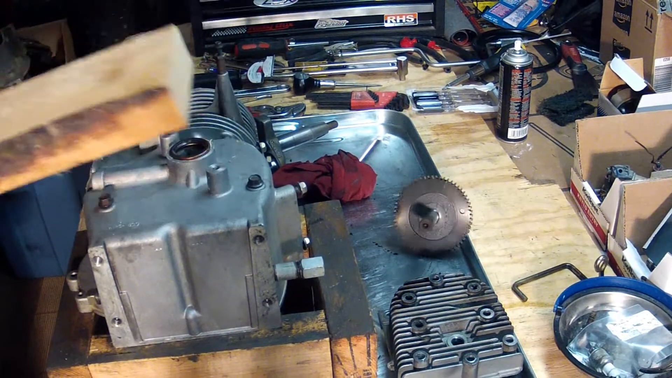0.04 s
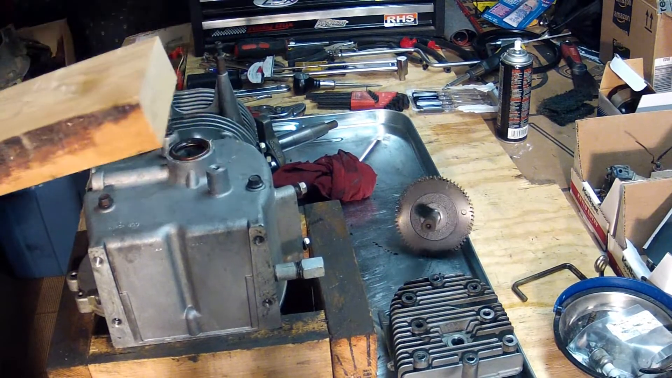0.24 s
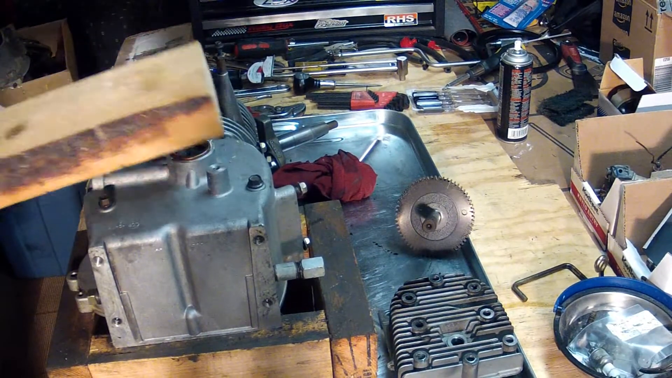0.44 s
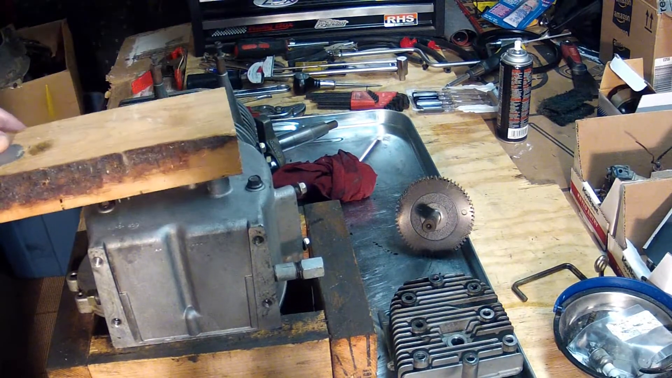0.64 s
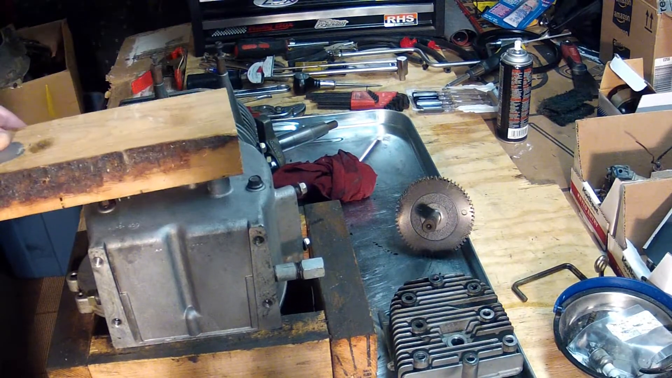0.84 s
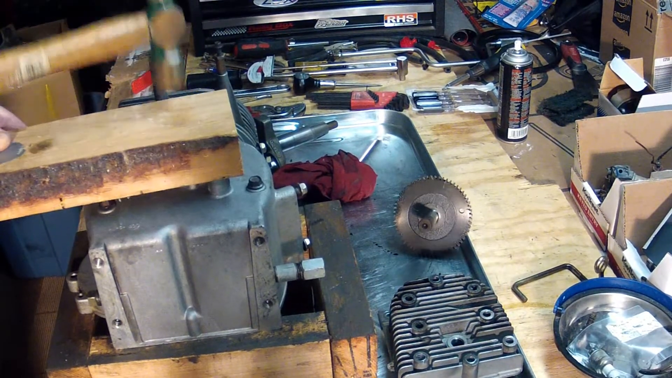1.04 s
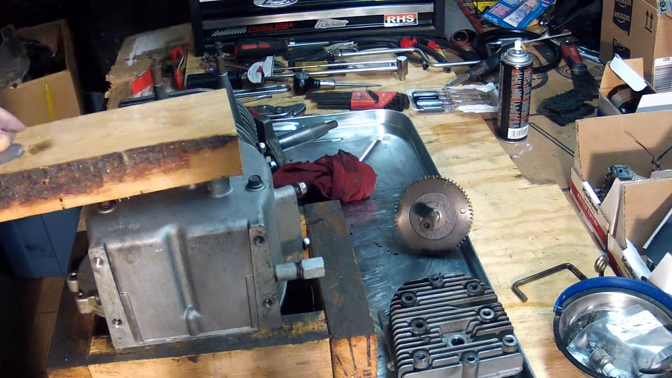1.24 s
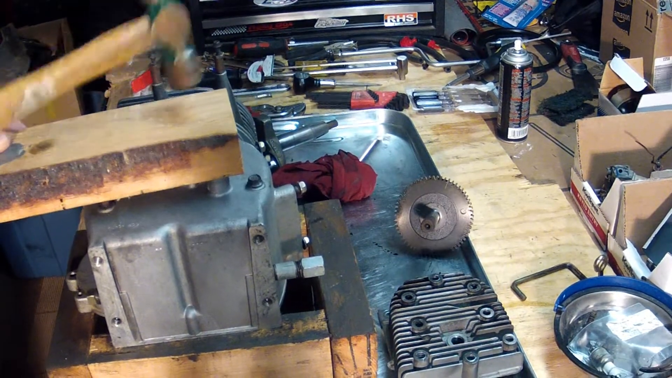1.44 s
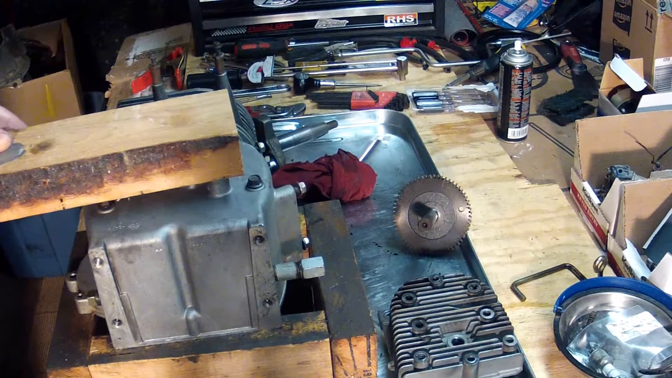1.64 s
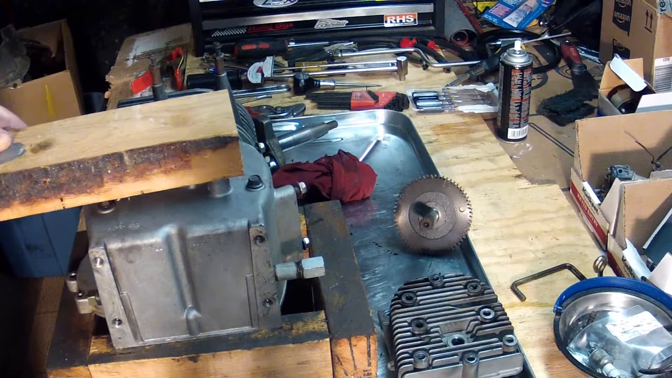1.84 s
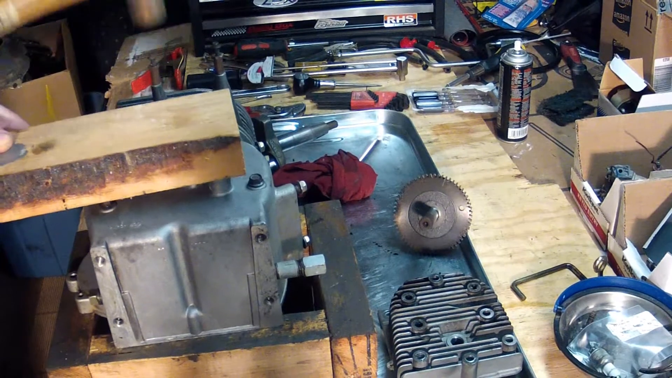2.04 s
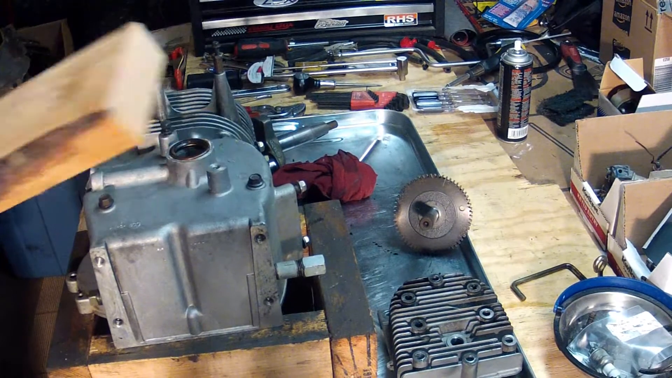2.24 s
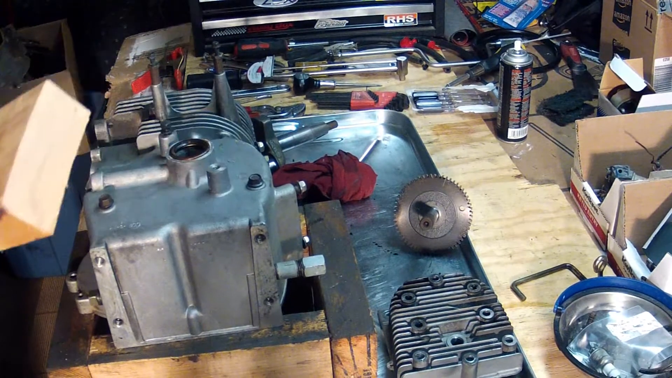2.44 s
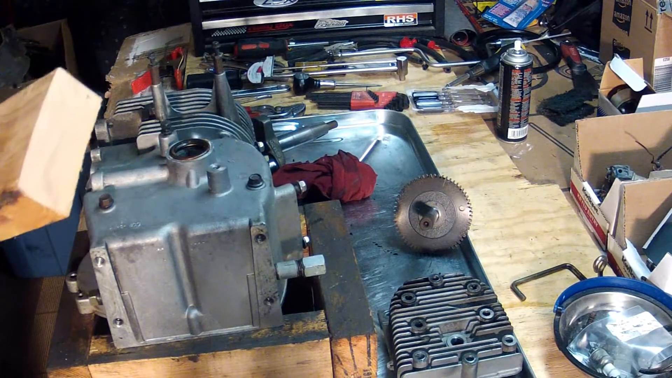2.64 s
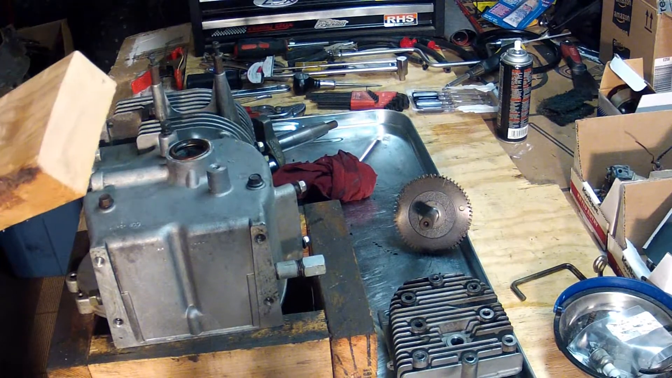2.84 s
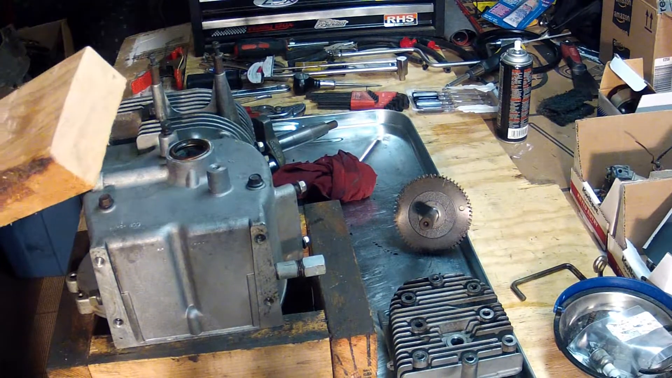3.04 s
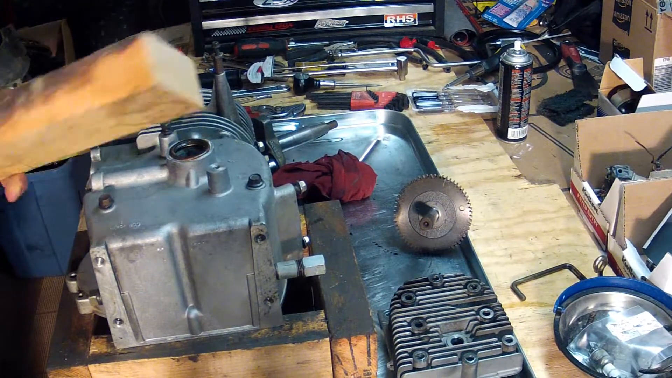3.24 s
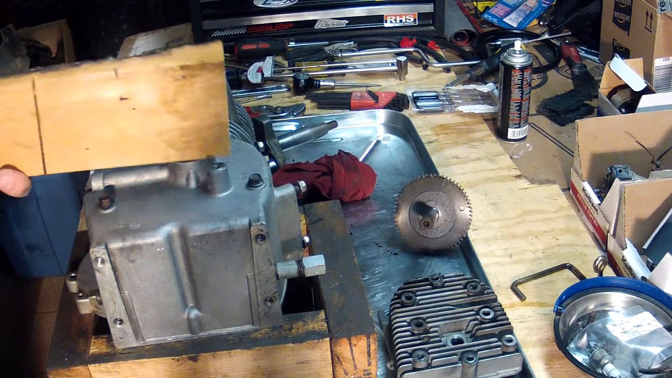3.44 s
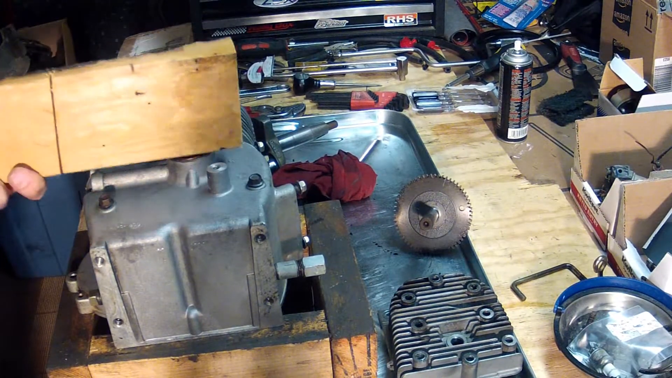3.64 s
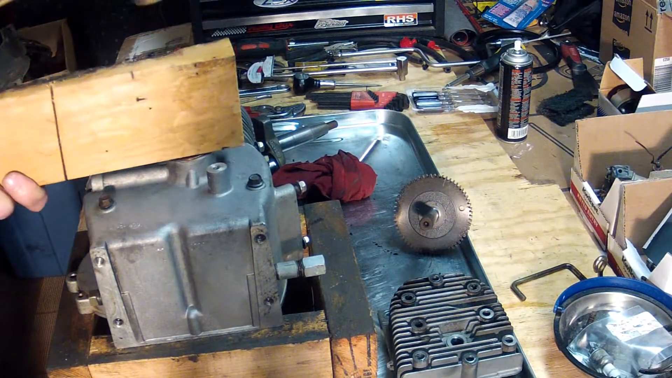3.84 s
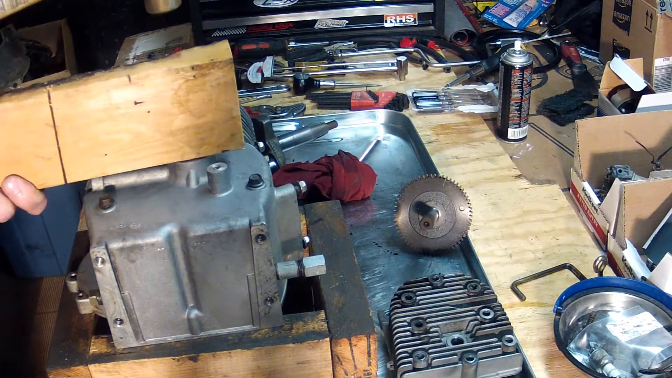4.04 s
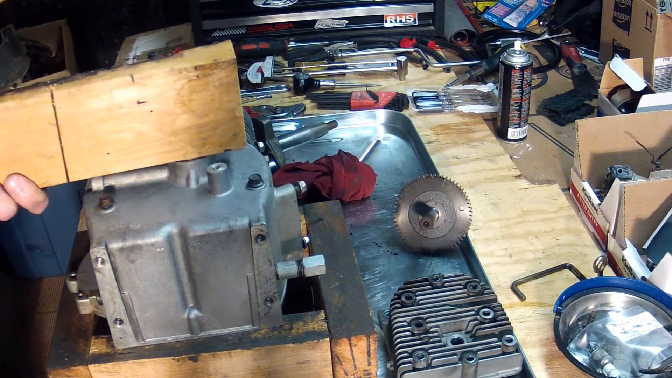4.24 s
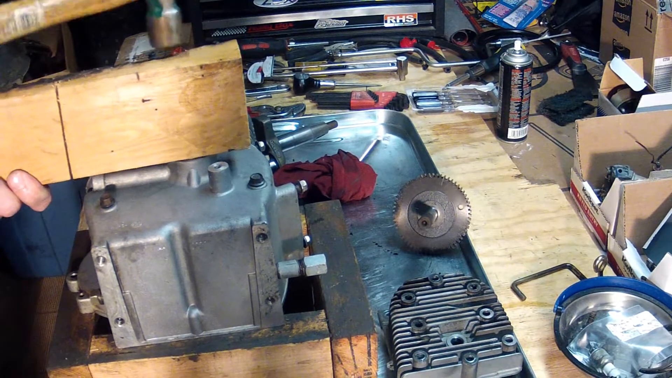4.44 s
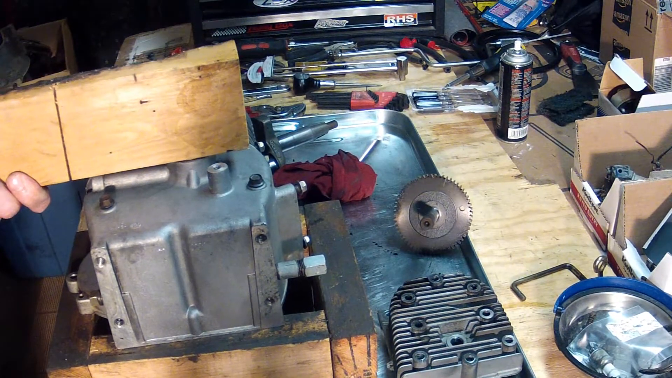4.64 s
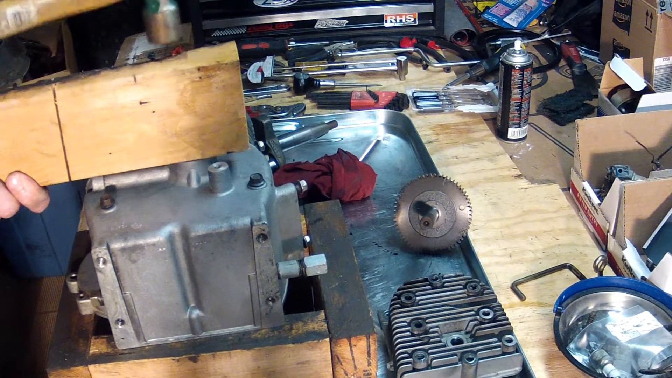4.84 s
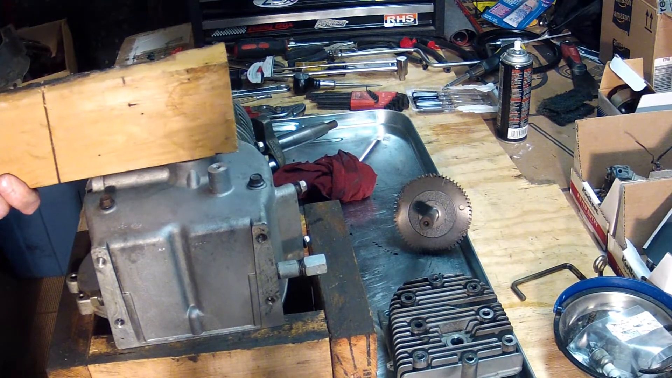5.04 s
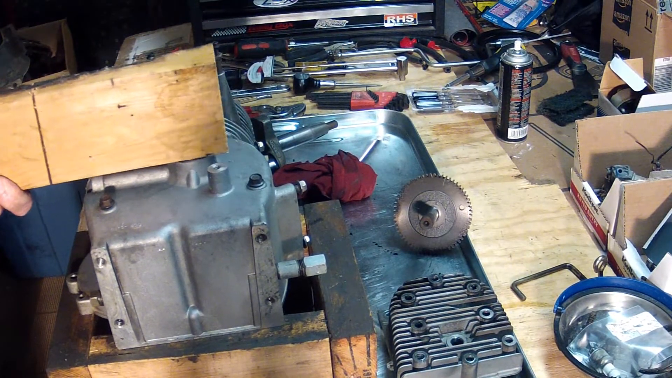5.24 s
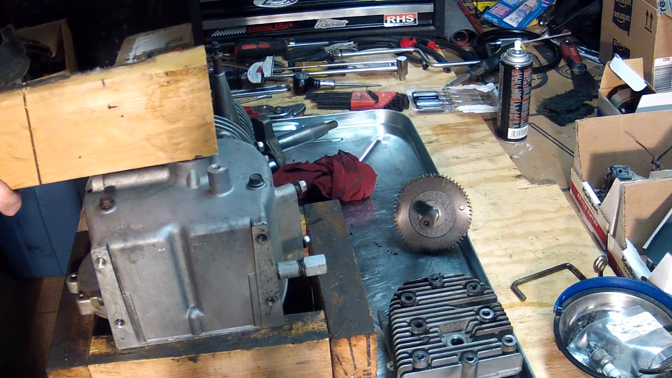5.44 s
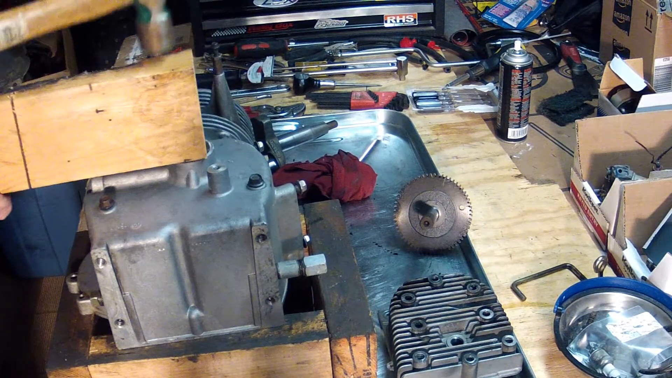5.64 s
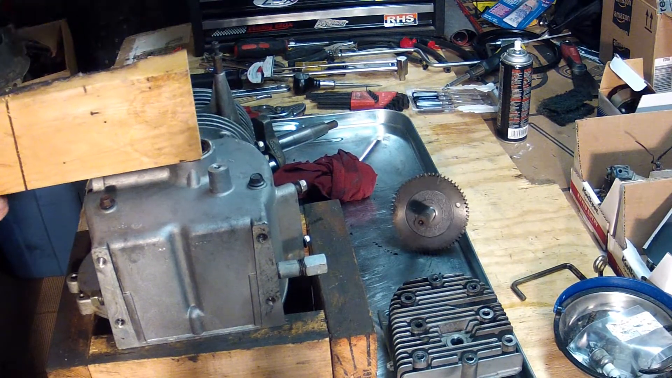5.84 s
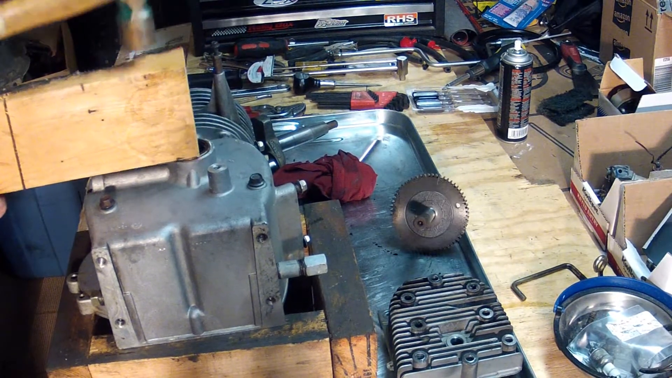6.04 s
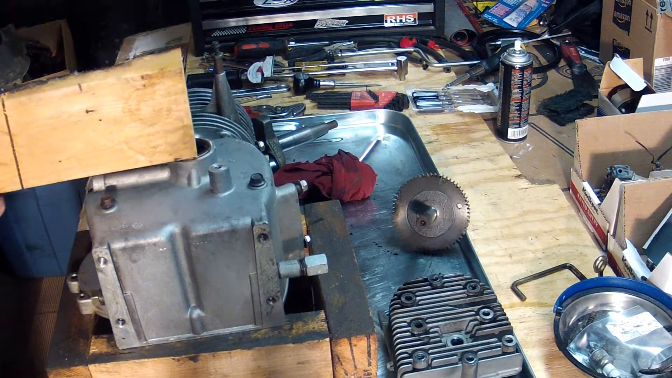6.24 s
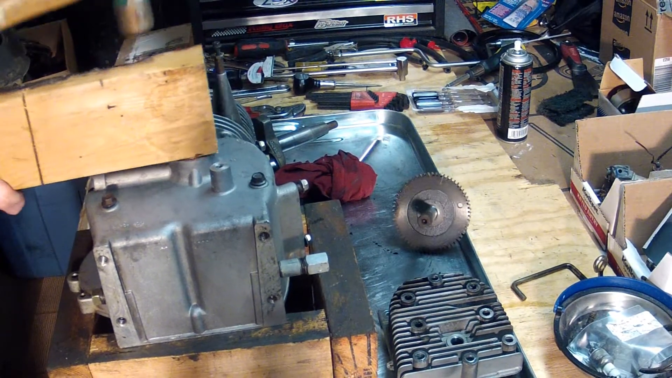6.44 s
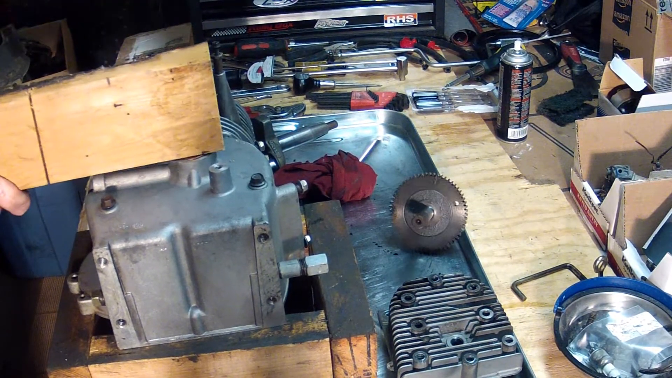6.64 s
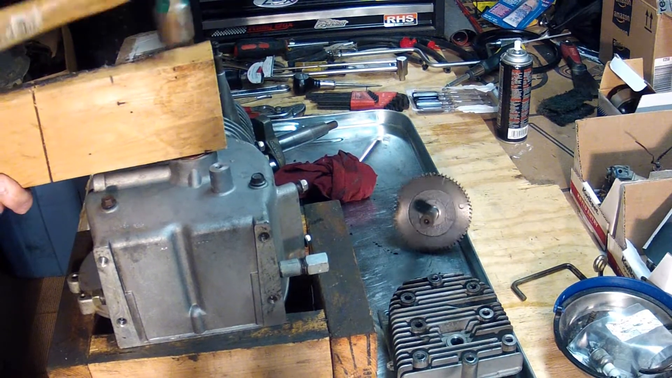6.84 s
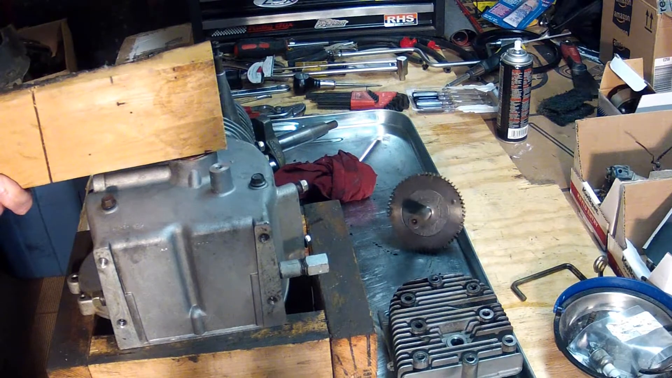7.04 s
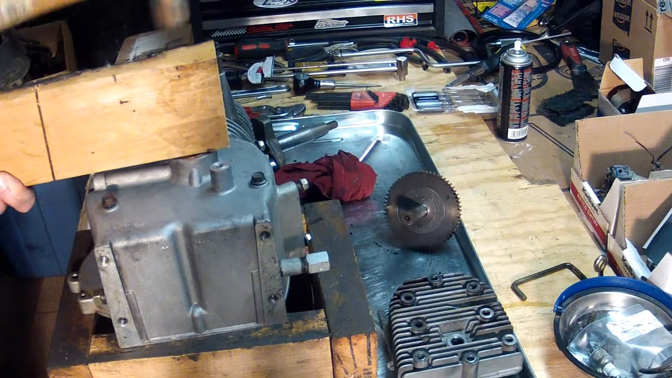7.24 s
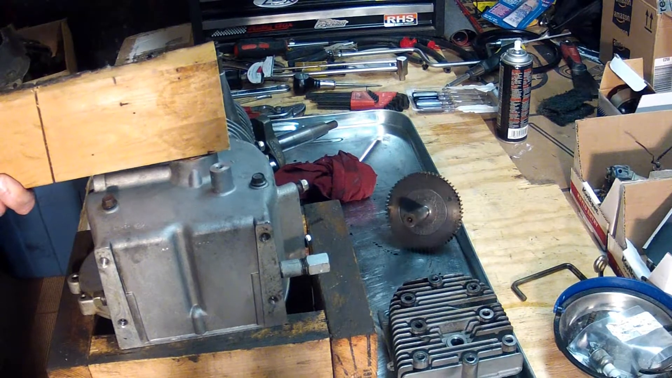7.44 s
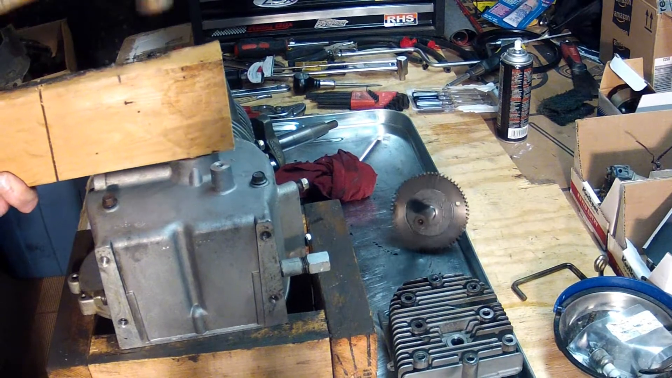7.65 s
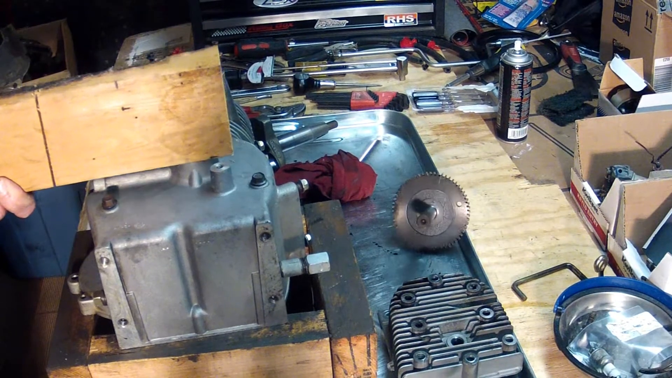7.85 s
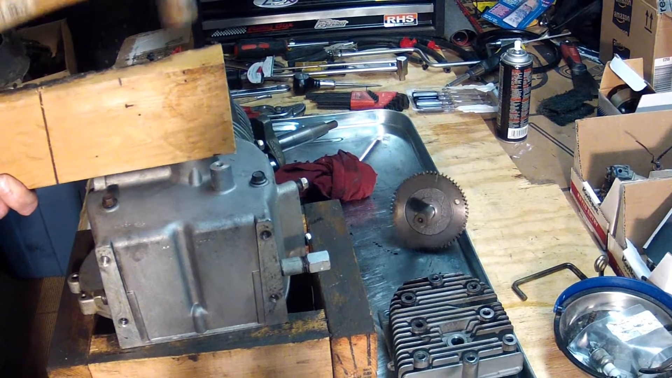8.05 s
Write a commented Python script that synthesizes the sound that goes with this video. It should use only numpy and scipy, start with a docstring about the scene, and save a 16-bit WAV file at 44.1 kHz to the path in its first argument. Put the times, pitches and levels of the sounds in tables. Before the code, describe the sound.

At the start, the ring of a hammer blow dies away in a small workshop. A wooden block scuffs lightly over a metal engine case and settles with a muffled bump at about 0.7 seconds. The hammer strikes the block three times, at about 1, 1.5 and 2 seconds, each harder than the last. Every blow gives a sharp woody crack, a short metallic ring and a thump from the bench. The block shifts faintly, then is set down with a soft thud near 3.8 seconds. Two blows with a slightly different tone land at 4.5 and 4.9 seconds. After a few light scrapes, seven more follow steadily from 5.8 to 8.1 seconds, the last ones growing stronger. The close mono microphone overloads on the knocks, its level dipping and swelling back as the room rings briefly over a faint low rumble.

```python
"""A hammer blow rings away over the low rumble of a small workshop, and a wooden block scuffs on metal.
The hammer is driving a seal into an engine case through the block: three more blows with it lying flat,
then nine, mostly quicker, with it on edge. Each one cracks the wood, rings the case and thumps the bench.
The knocks overload a close mono microphone, whose gain ducks and swells back while the room rings."""
import sys
import numpy as np
from scipy import signal
from scipy.fft import rfft, irfft
from scipy.io import wavfile

SR = 44100
rng = np.random.default_rng(int(sys.argv[2]) if len(sys.argv) > 2 else 0)


def waveform_to_disk(signal):
    """Save audio, clipped to [-1, 1], as 16-bit WAV at the path in sys.argv[1]."""
    frames = np.transpose(np.atleast_2d(signal))
    scaled = np.clip(frames, -1, 1) * 32767
    samples = np.round(scaled).astype(np.int16)
    wavfile.write(sys.argv[1], SR, samples)


N = 357210

# hammer blows, the first just before the scene opens: start_s, strength_db
BLOWS = [(-.115, -8), (1.0532, -4.5), (1.5431, -1), (2.0198, 0.5), (4.4924, -6), (4.878, -2),
         (5.7592, -5.5), (6.1403, -4), (6.508, -6), (6.9198, -3), (7.3102, -1.5), (7.6855, -0.5),
         (8.0987, 1)]
# how the block is held (flat, on edge, drawn back, pushed forward):
# from_s, contact_cutoff_hz, room_db, thump_db, symmetric_mode_bias_db
GRIPS = [(-1, 4400, 4, 3, 1), (4, 2930, 0.27, -0.5, 0.8), (6, 3730, 0, -0.4, 3.5), (7, 3680, 0, 0.55, 0.5)]
# the woody crack of the block, lying flat and standing on edge: pitch_hz, level_db, t60_s
FLAT_BLOCK_MODES = [(465, -4, 0.053), (550, -5.5, 0.06), (650, -3.5, .04), (820, -12.5, .035),
                    (994, -4, 0.039), (1420, -15.5, 0.024), (1693, 1.5, 0.033), (1967, -5, 0.099),
                    (2356, -3, .04), (2428, -7.5, 0.004), (2740, -2.5, 0.034), (2987, -9, .04),
                    (3829, -5.5, .03), (4086, -7.5, 0.064), (4800, -9.5, 0.042)]
EDGE_BLOCK_MODES = [(551.5, -3.5, 0.03), (775, -3, 0.032), (843, -6, 0.041), (1193, -8.5, 0.034),
                    (1438, -10, 0.034), (1679, -25.5, 0.049), (2241, 3, 0.017), (2754, -3, 0.042),
                    (3410, -11, 0.024), (3884, -3.5, 0.025), (4956, 0.5, 0.013)]
# the ring of the case and the metal parts around it: pitch_hz, level_db, t60_s
CASE_MODES = [(236, -22, .45), (261, -19, .5), (279, -7.5, .24), (326, -16, .4), (528, -30, .45),
              (648, -25, .5), (748, -23.5, .55), (1757, -25, .45), (2279, -27, .45), (2690, -20, .35),
              (2778, -23, .42), (3494, -29, .5), (3795, -25, .45), (3955, -28, .45), (4000, -38, .55),
              (4490, -19, .45), (4603, -29, .5), (4700, -29, .5), (4893, -26, .55), (4958, -38, .9),
              (5082, -33, .65), (5515, -33, .6), (5911, -31, .7)]
# case notes that the block stirs most, lying flat and standing on edge: pitch_hz, level_db, t60_s
FLAT_CASE_MODES = [(1050, -20, 0.33), (2245, -15.5, .35), (3940, -21, 0.53), (5360, -33, 0.98)]
EDGE_CASE_MODES = [(2672, -13.5, 0.36), (2655, -18.5, 0.27), (4025, -28, .4)]
# a steel part that sings on between the blows: pitch_hz, level_db, t60_s
STEEL_MODES = [(5270, -43, 2.2)]
# the thump of the engine bouncing on the bench: pitch_hz, level_db, t60_s
BENCH_MODES = [(68.6, -25, .8), (119, -12, 0.044), (288.6, 5, 0.069)]
# tone of the workshop's reverb: frequency_hz, level_db
REVERB_COLOUR = [(35, -19), (68, -5.5), (95, -12.5), (145, -7), (190, -14), (285, 2), (420, -8),
                 (800, -8.5), (1200, -15), (2100, -7), (3050, -6), (3300, -11.5), (5000, -12),
                 (6000, -10.5)]
# length of the reverb tail, band by band: centre_hz, t60_s
REVERB_DECAY = [(70, 0.73), (280, 0.61), (700, 0.5), (2000, 0.46), (5500, 0.43)]
# tone of the background rumble: frequency_hz, level_db
RUMBLE_COLOUR = [(12, -46), (20, -10), (128, -1), (352, -7.5), (435, -10), (663, -16.5), (1090, -22),
                 (1250, -21.5), (2250, -24.5), (2590, -25.5), (3960, -26.5), (5500, -26), (7150, -55),
                 (12100, -120)]
# light scuffs of the block over the metal: start_s, strength_db, length_s
SCUFFS = [(0.229, -39, .012), (0.294, -47, .02), (.366, -58, .01), (.416, -50.5, .04), (.669, -44.5, .006),
          (2.383, -49, .03), (4.781, -44.5, .003), (5.188, -42, .005), (5.332, -47, .003),
          (5.677, -58.5, .02)]
# the block set down on the case: start_s, strength_db
LANDINGS = [(.653, -38), (3.794, -26)]
# the block rocking into its seat: start_s, strength_db, length_s
ROCKINGS = [(.665, -26, .02), (0.751, -34.5, .01), (2.262, -31, .04), (4.002, -45, .002)]

LEAD, RING = SR // 2, 3 * SR // 2  # samples of pre-roll, and of tail after a knock
ON_EDGE_FROM_S = 3


def from_db(db):
    return 10 ** (np.asarray(db) / 20)


def at_hz(points, hz):
    known_hz, values = np.transpose(points)
    return np.interp(np.log(np.maximum(hz, 1)), np.log(known_hz), values)


def low_pass(x, cut_hz, order=2):
    return signal.sosfilt(signal.butter(order, cut_hz, fs=SR, output="sos"), x)


def add(track, start_s, sound):
    """Lay a sound into a track that starts LEAD samples early."""
    i = LEAD + round(start_s * SR)
    track[i:i + len(sound)] += sound[:max(len(track) - i, 0)]


def noise(colour, size):
    """Noise of a given colour, rms 1."""
    gain = from_db(at_hz(colour, np.fft.rfftfreq(size, 1 / SR)))
    x = irfft(rfft(rng.standard_normal(size)) * gain, size)
    return x / x.std()


def ring(modes, rise_s, scatter_db=1.2, symmetric_db=0):
    """Struck modes, alternately symmetric and antisymmetric; each hit shares its force out differently."""
    t, tones = np.arange(RING) / SR, 0
    for k, (hz, db, t60) in enumerate(modes):
        sign = (-1) ** k
        height = from_db(db + sign * symmetric_db + scatter_db * rng.standard_normal())
        decay = np.exp(-np.log(1000) * t / t60)
        tones = tones + sign * height * decay * np.cos(2 * np.pi * hz * t)
    return tones * (1 - np.exp(-t / rise_s))


def knock(start_s, contact_hz, walls, thump_db, metal_db, wood_db=5, symmetric_db=0, linger_db=-16.5):
    """Block, case, bench and room answer one contact; a softer contact leaves out the treble."""
    flat = start_s < ON_EDGE_FROM_S
    block_modes = FLAT_BLOCK_MODES if flat else EDGE_BLOCK_MODES
    case_modes = CASE_MODES + (FLAT_CASE_MODES if flat else EDGE_CASE_MODES)
    steel_db = -14 if flat else 0  # the flat block hardly stirs the steel part
    wood = from_db(wood_db) * ring(block_modes, rise_s=.0014, symmetric_db=symmetric_db)
    case = from_db(metal_db) * ring(case_modes, rise_s=.0096)
    steel = from_db(steel_db) * ring(STEEL_MODES, rise_s=.004)
    bench = from_db(thump_db) * ring(BENCH_MODES, rise_s=.0013, scatter_db=.6)
    # the block's own notes linger in the room
    lingering = from_db(linger_db) * signal.fftconvolve(walls, wood / np.linalg.norm(wood))[:RING]
    echo = wall_echo(from_db(-6.5) * (wood + bench), cut_hz=380) + wall_echo(lingering, cut_hz=980)
    return low_pass(wood + case + steel + bench + echo + walls, contact_hz)


def reverb(build_s=.0045):
    """Dense workshop reflections that bloom quickly and die sooner in the treble."""
    t, hz = np.arange(RING) / SR, np.fft.rfftfreq(RING, 1 / SR)
    spectrum, tail = rfft(noise(REVERB_COLOUR, RING)), 0
    for k, (_, t60) in enumerate(REVERB_DECAY):
        # each band crossfades into its neighbours
        band = at_hz([(centre, j == k) for j, (centre, _) in enumerate(REVERB_DECAY)], hz)
        tail = tail + irfft(spectrum * band, RING) * np.exp(-np.log(1000) * t / t60)
    return tail * (1 - np.exp(-t / build_s))


def wall_echo(x, cut_hz, delay_s=.0205):
    """The nearest wall sends the knock back as a dull slap."""
    delayed = np.pad(x, (round(delay_s * SR), 0))[:len(x)]
    return low_pass(delayed, cut_hz)


def scrape(touch, length_s, slips_per_s=900):
    """Wood slipping on metal smears a touch into a first tap and a spray of random grains."""
    size = round(length_s * SR)
    slips = rng.standard_normal(size) * (rng.random(size) < slips_per_s / SR)
    slips[0] = 2
    return signal.fftconvolve(touch, slips / np.linalg.norm(slips))


def hammering(rebound_s=.027, rebound_db=-13, chatter_above_hz=2500):
    """The hammer lands on the block, which then hops and chatters brightly on the seal."""
    track, shared_reverb = np.zeros(LEAD + N), reverb()
    bright = signal.butter(3, chatter_above_hz, "high", fs=SR, output="sos")
    for start_s, db in BLOWS:
        grip = [row for row in GRIPS if row[0] <= start_s][-1]
        _, contact_hz, room_db, thump_db, symmetric_db = grip
        # the block shifts, so the reflections are only partly alike from blow to blow
        walls = from_db(room_db - 4.5) * (.8 * shared_reverb + .6 * reverb())
        hit = knock(start_s, contact_hz, walls, thump_db, metal_db=1.14, symmetric_db=symmetric_db)
        add(track, start_s, from_db(db) * hit)
        hop = knock(start_s, contact_hz, from_db(-10) * walls, thump_db, metal_db=-9)
        chatter = scrape(signal.sosfilt(bright, hop), length_s=.015, slips_per_s=1500)
        add(track, start_s + rebound_s, from_db(db + rebound_db) * chatter)
    return track


def room_tone(rumble_db=-60.5, hum_hz=112, hum_db=-78):
    """A bed of low rumble and faint mains hum."""
    hum = np.sqrt(2) * np.sin(2 * np.pi * hum_hz * np.arange(LEAD + N) / SR)
    return from_db(rumble_db) * noise(RUMBLE_COLOUR, LEAD + N) + from_db(hum_db) * hum


def scuffing(contact_hz=4300):
    """The block slides over the case in short, light, bright scratches."""
    track = np.zeros(LEAD + N)
    for start_s, db, length_s in SCUFFS:
        touch = knock(start_s, contact_hz, reverb(), thump_db=.5, metal_db=-6.5, wood_db=3.5,
                      linger_db=-28)
        add(track, start_s, from_db(db) * scrape(touch, length_s))
    return track


def setting_down(thud_cut_hz=807, tick_cut_hz=4942, tick_db=-51.5):
    """The block lands on the case with a soft thud and a tick of its edge."""
    track = np.zeros(LEAD + N)
    for start_s, db in LANDINGS:
        walls = reverb()
        thud = knock(start_s, thud_cut_hz, walls, thump_db=3.5, metal_db=8, wood_db=6)
        tick = knock(start_s, tick_cut_hz, walls, thump_db=1, metal_db=3, wood_db=11.5)
        add(track, start_s, from_db(db) * thud + from_db(tick_db) * tick)
    return track


def rocking(contact_hz=432):
    """The block rocks into its seat with muffled, bass-heavy bumps."""
    track = np.zeros(LEAD + N)
    for start_s, db, length_s in ROCKINGS:
        touch = knock(start_s, contact_hz, reverb(), thump_db=6.5, metal_db=-2.5)
        add(track, start_s, from_db(db) * scrape(touch, length_s))
    return track


def automatic_gain(x, threshold_db=-10, late_s=.003, attack_s=.0024, release_db_per_s=70):
    """The gain ducks a few milliseconds too late for the knock, then climbs back steadily."""
    t, window = np.arange(len(x)) / SR, SR // 500
    power = signal.lfilter(np.ones(window) / window, [1], x * x)
    over_db = np.maximum(10 * np.log10(np.maximum(power, 1e-12)) - threshold_db, 0)
    duck_db = np.maximum.accumulate(over_db + release_db_per_s * t) - release_db_per_s * t
    late_duck_db = np.interp(t - late_s, t, duck_db)
    pole = np.exp(-1 / (attack_s * SR))
    return from_db(-signal.lfilter([1 - pole], [1, -pole], late_duck_db))


def scene(leak_s=.0007):
    """One microphone with a pumping gain feeds two almost identical channels."""
    sound = hammering() + setting_down() + rocking() + scuffing() + room_tone()
    gain = automatic_gain(sound)
    mono = (gain * sound)[LEAD:]
    # each change of gain leaks out as a low bump, opposite in the two channels
    bump = -leak_s * SR * low_pass(np.gradient(gain), cut_hz=150, order=1)[LEAD:]
    hiss = from_db(-76) * noise([(20, -2.5), (200, 3), (800, -9.5), (5500, -14)], N)
    side = bump + hiss
    return np.array([mono + side, mono - side])


def record(dry):
    """A slow converter clips the knocks and holds each sample, mirroring the sound into the treble."""
    converter_hz, cutoff_hz = 12000, 15400
    slow = signal.resample_poly(dry, converter_hz, SR, axis=1, window=("kaiser", 8))
    clipped = np.clip(slow, -1, 1)
    softened = signal.lfilter([.9, .72], [1, .62], clipped)  # a dip near half the converter's rate
    steps = np.repeat(softened, 4, axis=1)
    held = signal.resample_poly(steps, SR, 4 * converter_hz, axis=1)[:, :N]
    top_cut = signal.ellip(10, .1, 70, cutoff_hz, fs=SR, output="sos")
    return np.clip(signal.sosfilt(top_cut, held), -1, 1)


dry = scene()
out = record(dry)
waveform_to_disk(out)
```